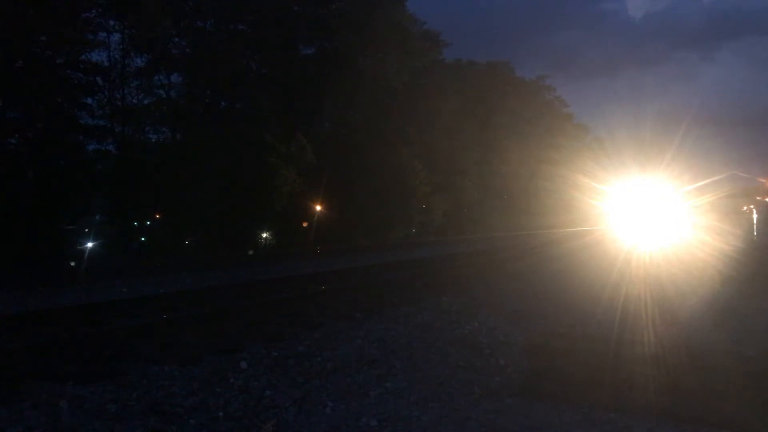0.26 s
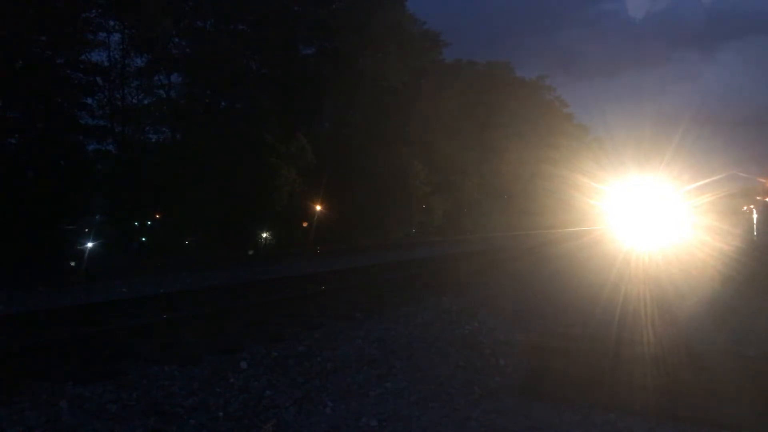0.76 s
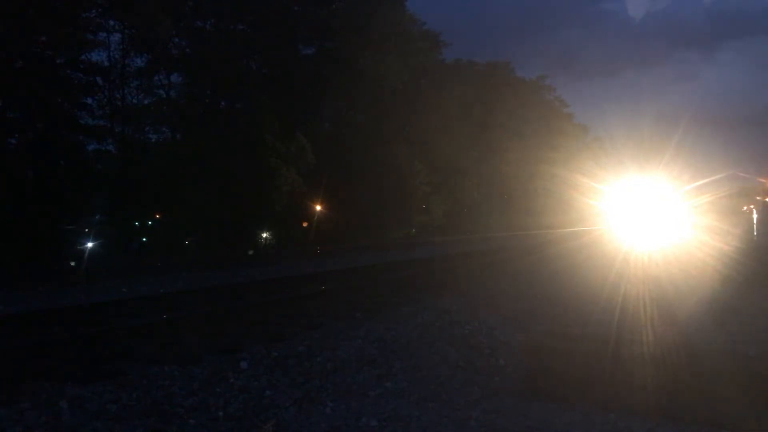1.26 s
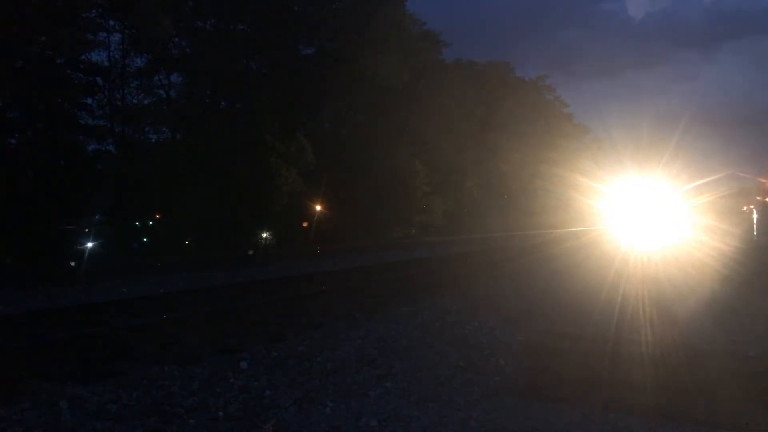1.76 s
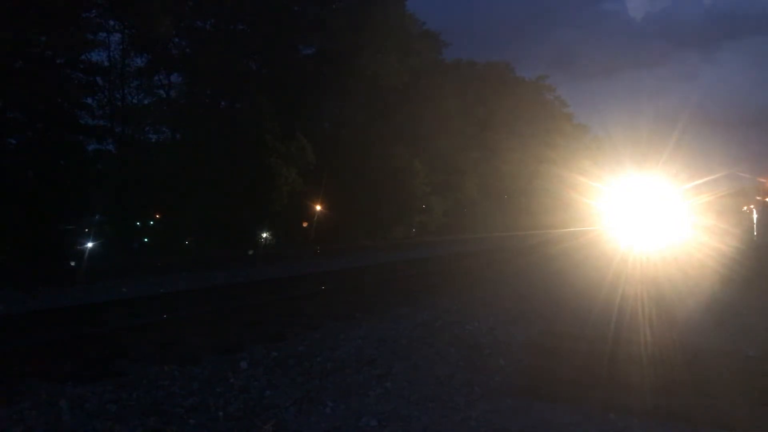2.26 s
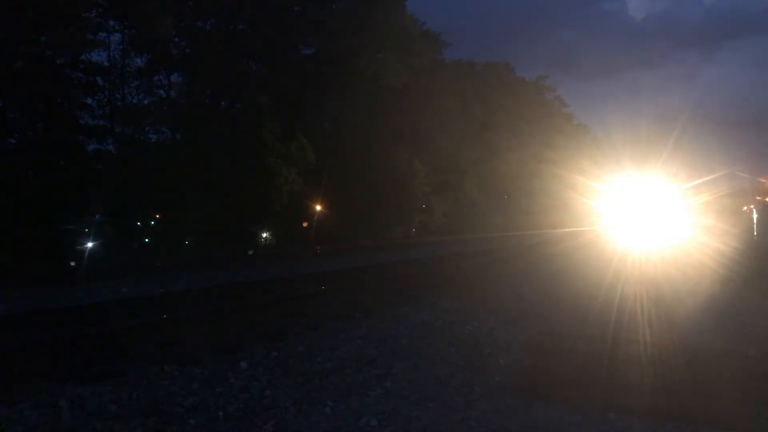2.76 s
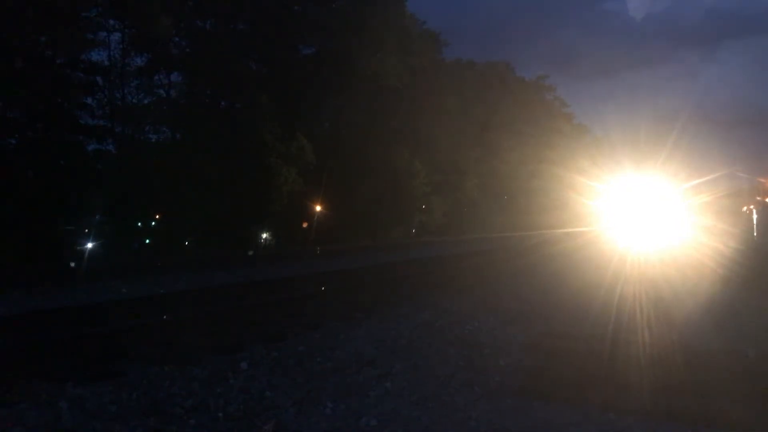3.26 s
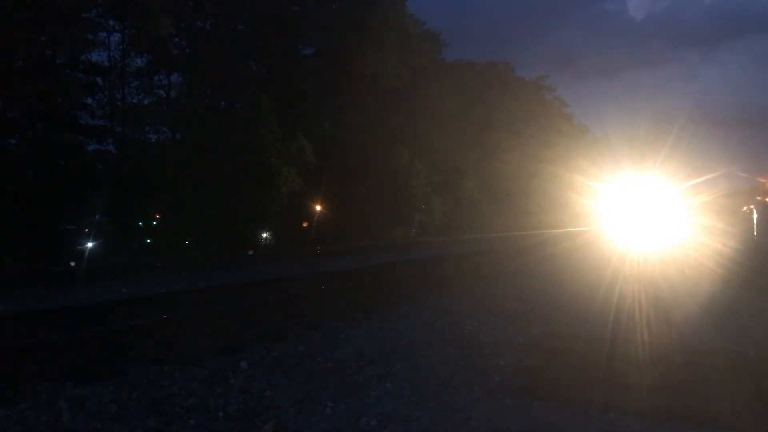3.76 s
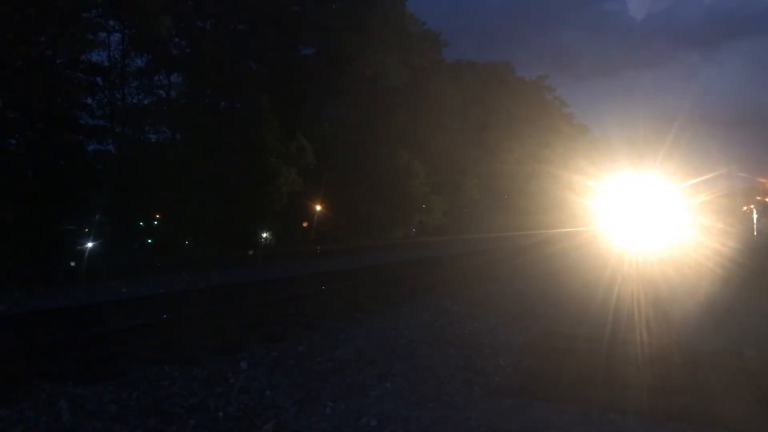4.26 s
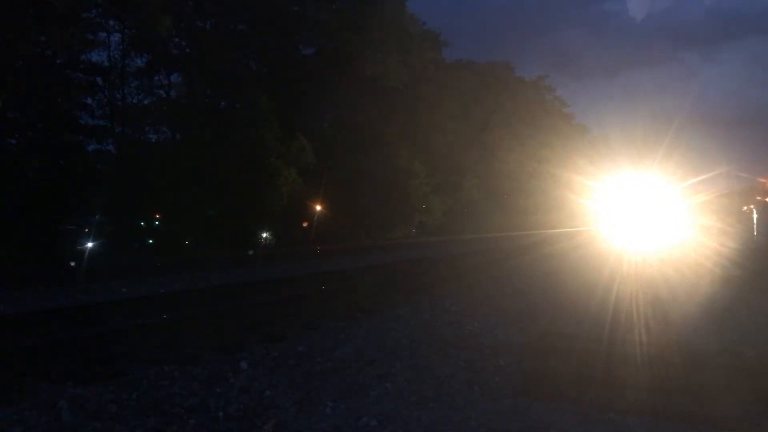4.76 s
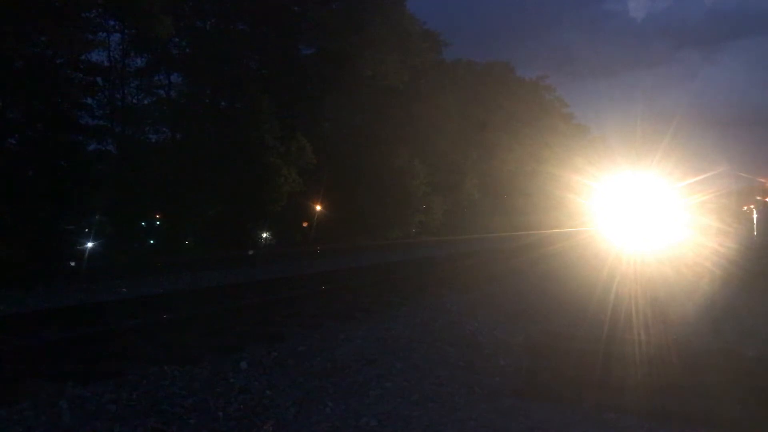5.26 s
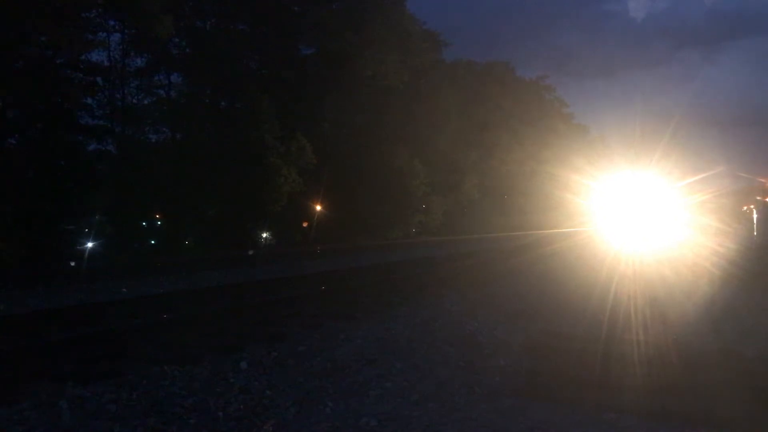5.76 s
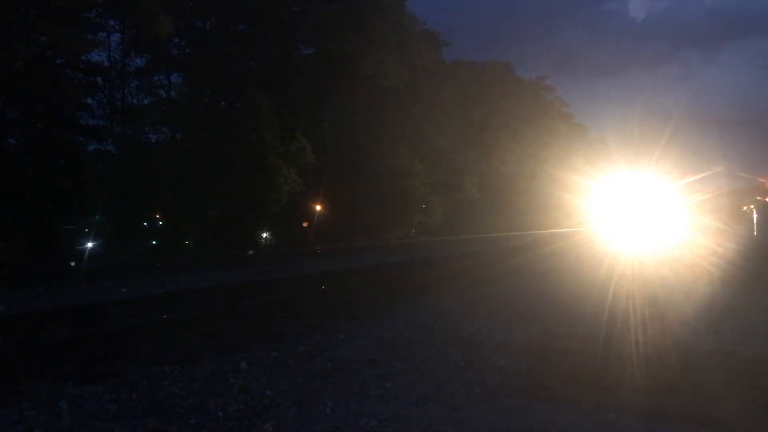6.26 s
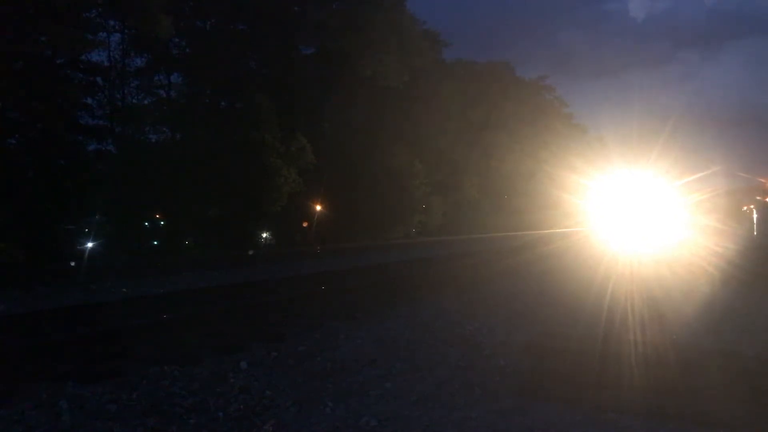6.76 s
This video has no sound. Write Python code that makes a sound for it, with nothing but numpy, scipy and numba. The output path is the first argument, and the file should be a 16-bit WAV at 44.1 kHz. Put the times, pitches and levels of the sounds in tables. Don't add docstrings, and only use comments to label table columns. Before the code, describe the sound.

A distant diesel locomotive drones in a deep, steady throb while katydids and crickets chirp, and a few sharp knocks jolt close by.

```python
import sys
import numpy as np
from scipy import signal
from scipy.fft import rfft, irfft
from scipy.io import wavfile
from scipy.ndimage import uniform_filter1d
from numba import njit

SR = 44100
rng = np.random.default_rng(int(sys.argv[2]) if len(sys.argv) > 2 else 0)


def store_pcm(level_fs):
    pcm = np.round(np.clip(level_fs, -1, 1) * 32767).astype(np.int16)
    wavfile.write(sys.argv[1], SR, np.atleast_2d(pcm).T)


def amplitude_ratio(level_db):
    exponent = np.asarray(level_db, float) / 20
    return 10 ** exponent


N = 308700


def unit(x):
    return x / np.sqrt(np.mean(x ** 2))


def curves(table):
    time_s, *columns = np.transpose(table)
    return [np.interp(np.arange(N) / SR, time_s, column) for column in columns]


def walk(rate_hz):
    hold = int(SR / rate_hz)
    held = np.repeat(rng.standard_normal(N // hold + 1), hold)
    return 0.94 * uniform_filter1d(uniform_filter1d(held, hold), hold)[:N]


@njit
def svf(x, hz, width_hz):
    y, band, low = np.empty(len(x)), 0., 0.
    for i in range(len(x)):
        g, k = np.tan(np.pi * hz[i] / SR), width_hz / hz[i]
        v = (band + g * (x[i] - low)) / (1 + g * (g + k))
        band, low, y[i] = 2 * v - band, low + 2 * g * v, k * v
    return y


def resonate_twice(x, hz, width_hz):
    return unit(svf(svf(x, hz, 1. * width_hz), hz, 1. * width_hz))


def hiss(hz, width_hz):
    return resonate_twice(rng.standard_normal(N), hz * np.ones(N), width_hz)


def coloured(spectrum, flicker_db, rate_hz):
    hz = np.maximum(np.fft.rfftfreq(N, 1 / SR), 1)
    f, db = np.transpose(spectrum)
    colour = amplitude_ratio(np.interp(np.log(hz), np.log(f), db)) * np.sqrt(SR / 2)
    noise = rfft(rng.standard_normal(N)) * colour
    half_octave = 2 * np.log2(hz)
    first, last = int(2 * np.log2(f[0])), int(2 * np.log2(min(f[-1], SR / 2))) + 1
    out = 0
    for band in range(first, last + 1):
        share = np.maximum(1 - abs(half_octave - band), 0)
        out = out + irfft(noise * share, N) * amplitude_ratio(flicker_db * walk(rate_hz))
    return out


def ring(modes, push, length_s):
    t = np.arange(int(length_s * SR)) / SR
    tones = 0
    for hz, db, t60_s, polarity in modes:
        decay = np.exp(-np.log(1000) * t / t60_s)
        tones = tones + polarity * amplitude_ratio(db) * np.sin(2 * np.pi * hz * t) * decay
    return np.convolve(tones, push / push.sum())


def crack(hz, width_hz, rattle_ms, chance):
    x = .4 * chance * np.exp(-1000 * np.arange(len(chance)) / SR / rattle_ms)
    x[0] = 1.5
    for _ in range(3):
        x = svf(x, np.full(len(x), 1. * hz), 1.6 * width_hz)
    return x / abs(x).max()


def add(out, start_s, x):
    i = int(start_s * SR)
    out[i:i + len(x)] += x[:N - i]


def engine():
    # time_s, shaft_hz
    shaft = [(0, 15.24), (1.5, 15.22), (2.5, 15.19), (3.1, 15.28), (4.5, 15.25), (5.5, 15.19), (7, 15.18)]
    # multiple, level_db, wander_db
    weak_orders = [(2, -66, 3), (3, -50.5, 2), (5, -52, 3.5), (7, -56, 3), (8, -61, 3), (10, -66, 3),
                   (12, -64, 3), (24, -63, 4)]
    # freq_hz, level_db_per_hz
    rumble_spectrum = [(20, -72), (33, -67), (40, -54.5), (60, -58), (85, -53.5), (100, -62), (135, -63),
                       (185, -75), (215, -83), (300, -87.5)]
    # time_s, strength_db, lean_db
    air = [(0, -0.5, -2), (.3, 3, -1.5), (.65, 0, -3.5), (1.0, -5, -1.7), (1.3, -1.6, -1.9), (2.3, -2, -2),
           (2.7, -1.5, -4.5), (3.1, 1.2, 3.5), (3.55, -0.2, 1.8), (4.0, 3, 0.8), (4.55, -0.4, 1.5),
           (4.9, -1.4, -2.5), (5.6, 0.1, -2), (6.0, -0.8, 0.3), (6.7, 0.7, -1.5), (7, -1, -2.5)]
    # knock_s, depth_db
    ducks = [
        (2.927, -4),
        (3.204, -2),
        (6.272, -16),
    ]
    duck_late_s, duck_wide_s = 0.15, 0.15

    t = np.arange(N) / SR
    sway_db, lean_db = curves(air)
    for knock_s, depth_db in ducks:
        sway_db = sway_db + depth_db * np.exp(-((t - knock_s - duck_late_s) / duck_wide_s) ** 2)
    shaft_hz, = curves(shaft)
    turn = 2 * np.pi * np.cumsum(shaft_hz) / SR

    drone = amplitude_ratio(lean_db) * np.sin(4 * turn) + amplitude_ratio(-lean_db) * np.sin(6 * turn + 1.38)
    ninth_db = -55.5 + 1.39 * t + 1.8 * walk(3.35)
    orders = amplitude_ratio(-36 + sway_db) * drone + amplitude_ratio(ninth_db) * np.sin(9 * turn)
    for multiple, db, wander_db in weak_orders:
        level = amplitude_ratio(db + wander_db * walk(3.13))
        orders = orders + level * np.sin(multiple * turn + 1.98 * walk(1.57))
    rumble = amplitude_ratio(0.12 * sway_db) * coloured(rumble_spectrum, flicker_db=2.0, rate_hz=8.8)
    return np.sqrt(2) * orders + rumble


def stand():
    # start_s, head_db, legs_db, hum_db
    knocks = [(1.984, -47, -44, -55), (2.178, -40.5, -38, -40), (2.417, -27.5, -38, -54),
              (2.926, -16.5, -28, -27.5), (2.958, -39, -36, -28), (2.9935, -43, -49, -29.5),
              (3.204, -21.5, -34, -20), (5.561, -33.5, -46, -36), (5.784, -40, -41, -45),
              (6.271, -17, -29.5, -23.5), (6.2805, -26.5, -52, -44)]
    # freq_hz, level_db, t60_s, polarity
    head_modes = [(267, -11.5, 0.024, 1), (335.2, -14, 0.29, -1.6), (400, 0, 0.058, -0.84),
                  (448, -10, 0.13, -1.46), (516, 7.5, 0.072, 0.64), (572, -6, 0.055, -1.36),
                  (660, -15.5, 0.054, 0.92), (756, -18, 0.069, -1), (905, -11.5, 0.031, 0.27),
                  (1073, -17, 0.033, -1), (1226, -13, 0.054, 0.54)]
    # freq_hz, level_db, t60_s, polarity
    leg_modes = [(42, -4, .35, 1), (125, -4, .25, 1), (166, 0, .2, -1), (205, -3, .15, 1),
                 (240, -5, .12, -1)]
    # freq_hz, level_db, t60_s, polarity
    hum_mode = [(82.5, 0, .95, -1)]
    soft_tilt_db_per_oct, hard_db, tilt_per_db = -4.5, -23, 1.42

    out = np.zeros(N)
    chances = rng.standard_normal((len(knocks), 3000))
    for (start_s, head_db, legs_db, hum_db), chance in zip(knocks, chances):
        joints = crack(747, 290, 12, chance)
        add(out, start_s, amplitude_ratio(head_db - 18) * joints)
        tilt_db = soft_tilt_db_per_oct + tilt_per_db * max(head_db - hard_db, 0)
        head = [(hz, db + tilt_db * np.log2(hz / 500), t60_s, polarity)
                for hz, db, t60_s, polarity in head_modes]
        add(out, start_s, amplitude_ratio(head_db - 3) * ring(head, np.hanning(30), .4))
        add(out, start_s + .004, amplitude_ratio(legs_db + 2.5) * ring(leg_modes, np.hanning(60), .6))
        add(out, start_s + 0.01046, amplitude_ratio(hum_db) * ring(hum_mode, np.hanning(160), 1.))
    return out


def clicks():
    # start_s, peak_db, tilt_db_per_oct, rattle_ms
    ticks = [(3.2635, -60, 14, .5), (4.225, -32, 0, .6), (4.227, -53, 4, 11), (4.2313, -43, -10, .4),
             (4.2364, -44, -8, .5), (4.4383, -58, 4, .5), (4.654, -62, 14, .6), (5.185, -39, -12, 1.6),
             (5.385, -63, 12, 12), (6.0165, -52, 6, 3), (6.027, -59, 12, .5)]
    # freq_hz, width_hz, level_db
    shell = [(3500, 1300, -6), (4900, 1300, -3), (6800, 1500, 0), (8700, 2500, -16), (11500, 4000, -15),
             (14000, 3000, -20)]
    # start_s, peak_db, freq_hz, rattle_ms
    creak = [
        (4.6, -42, 1600, 4),
        (4.605, -47, 3700, 2),
        (4.607, -43, 2400, 8),
        (4.611, -35.5, 650, 3),
        (4.611, -43, 3500, 3),
        (4.6195, -38, 1600, 5),
    ]

    out = np.zeros(N)
    chances = rng.standard_normal((len(ticks), 1200))
    for (start_s, peak_db, tilt_db, rattle_ms), chance in zip(ticks, chances):
        tick = 0
        for k, (hz, width_hz, db) in enumerate(shell):
            gain = (-1) ** k * amplitude_ratio(db + tilt_db * np.log2(hz / 6700))
            tick = tick + gain * crack(hz, width_hz, rattle_ms, chance)
        add(out, start_s, amplitude_ratio(peak_db) * tick / abs(tick).max())
    chances = rng.standard_normal((len(creak), 1200))
    for (start_s, peak_db, hz, rattle_ms), chance in zip(creak, chances):
        add(out, start_s, amplitude_ratio(peak_db) * crack(hz, .35 * hz, rattle_ms, chance))
    return out


def rasps():
    # first_rasp_s, rasp_count, level_db
    phrases = [
        (.63, 3, -60),
        (2.57, 3, -59),
        (3.86, 2, -61),
        (5.95, 3, -61),
    ]
    # middle_s, length_s, level_db
    lone = [
        (.1, .12, -69),
        (1.4, 0.26, -69),
        (1.687, .08, -64),
        (1.88, 0.11, -66),
        (3.22, .1, -74),
        (4.335, 0.11, -66),
        (4.6, .2, -66),
        (6.653, 0.24, -64.5),
        (6.955, 0.09, -63),
    ]
    gap_s, rasp_s, lead_db, tire_db = 0.182, 0.15, -9.5, -1.6

    sung = []
    for first_s, count, db in phrases:
        for k in range(-1, count):
            change_db = lead_db if k < 0 else k * tire_db
            sung.append((first_s + k * gap_s, rasp_s, db + change_db))
    return sung + lone


def insects():
    # freq_hz, width_hz, level_db, throb_hz
    choirs = [(4520, 920, -64.5, 57), (5150, 480, -77.5, 50), (6060, 1000, -73.5, 31),
              (11830, 600, -84, 40), (11630, 3300, -80, 30)]

    t = np.arange(N) / SR
    stroke = 0
    for middle_s, length_s, db in rasps():
        stroke = stroke + amplitude_ratio(db) * np.exp(-(2.3 * (t - middle_s) / length_s) ** 4)
    teeth = (rng.random(N) < 3000 / SR) * rng.standard_normal(N)
    wing_hz = 4650 * (1 + 0.043 * walk(8.7))
    out = stroke * resonate_twice(teeth, wing_hz, 1000)
    for hz, width_hz, db, throb_hz in choirs:
        level = amplitude_ratio(db + 0.89 * walk(throb_hz) + 0.45 * walk(1.38))
        out = out + level * hiss(hz, width_hz)
    return out


def crickets():
    # first_pulse_s, pitch_hz, level_db
    chirps = [(.566, 5000, -66), (1.097, 5000, -61), (1.70, 4980, -59), (2.513, 5000, -59),
              (3.182, 5000, -61), (3.868, 5000, -65), (4.633, 4980, -61), (5.283, 5000, -62),
              (5.92, 5000, -63), (6.63, 4990, -58), (3.313, 4640, -61), (3.775, 4630, -61),
              (4.557, 4600, -61), (6.22, 4620, -59)]
    gap_s, pulse_s, sag_share = .0455, .016, 0.026

    out, u = np.zeros(N), np.linspace(0, 1, int(pulse_s * SR))
    chances = rng.standard_normal((len(chirps), 3))
    for (first_s, hz, db), chance in zip(chirps, chances):
        pitch_hz = hz * (1 + sag_share * (.5 - u))
        pulse = np.sin(np.pi * u) * np.sin(2 * np.pi * np.cumsum(pitch_hz) / SR)
        for k, c in enumerate(chance):
            add(out, first_s + k * gap_s - pulse_s / 2, amplitude_ratio(db + 1.5 * c) * pulse)
    return out


def roar():
    # freq_hz, level_db
    roar_spectrum = [(120, -8), (200, 1), (219, -7.5), (298, -4.5), (327, -3), (365, -6), (506, -2),
                     (554, -1), (755, -7), (1510, -7), (2400, -13.5), (3480, -20.5), (4580, -24.5),
                     (8040, -40.5), (11600, -45.5), (15500, -42.5)]
    # freq_hz, width_hz, level_db
    stack = [(366.4, 52, -59), (445, 155, -60.5), (961, 240, -57)]
    # time_s, freq_hz, level_db
    bounce = [(0, 527, -59), (2, 530, -77), (4, 603, -61.5), (5.5, 588, -57.5), (7, 626, -59.5)]
    # time_s, freq_hz, level_db
    blower = [(0, 7500, -88), (2.5, 7480, -81), (3.5, 7270, -79.5), (5, 7100, -79), (7, 6900, -79)]

    out = amplitude_ratio(-47) * unit(coloured(roar_spectrum, flicker_db=1.45, rate_hz=9.5))
    for hz, width_hz, db in stack:
        level = amplitude_ratio(db + 0.88 * walk(4.42))
        out = out + level * hiss(hz * (1 + 0.012 * walk(1.055)), width_hz)
    bounce_hz, bounce_db = curves(bounce)
    out = out + amplitude_ratio(bounce_db + 0.5 * walk(1.8)) * hiss(bounce_hz, 72)
    blower_hz, blower_db = curves(blower)
    return out + amplitude_ratio(blower_db) * hiss(blower_hz, 600)


def scene():
    return (engine() + stand() + clicks() + insects() + crickets() + roar())[None]


def band_limit(x):
    return signal.sosfilt(signal.butter(12, 15640, fs=SR, output="sos"), x)


def record(dry):
    bass_cut = signal.butter(2, 25, "high", fs=SR, output="sos")
    top_cut = signal.ellip(8, .2, 60, 15750, fs=SR, output="sos")
    cut = signal.sosfilt(top_cut, signal.sosfilt(bass_cut, dry))
    return band_limit(cut)


dry = scene()
out = record(dry)
store_pcm(out)
```